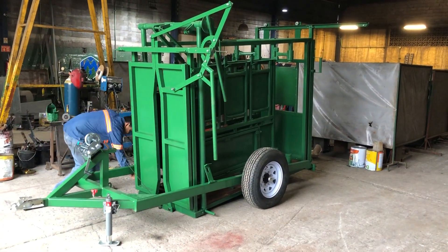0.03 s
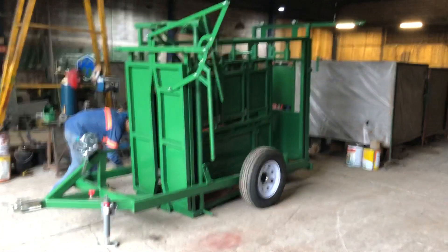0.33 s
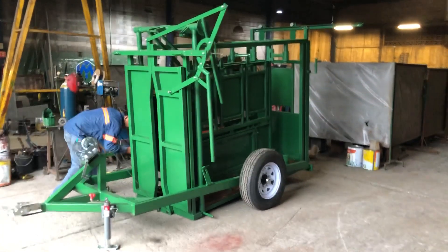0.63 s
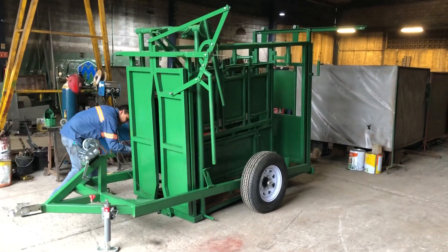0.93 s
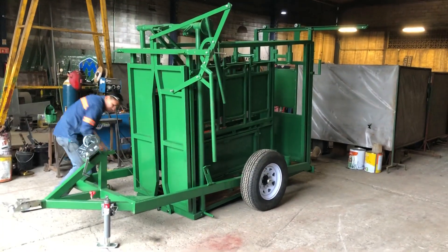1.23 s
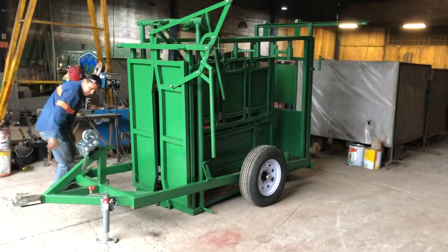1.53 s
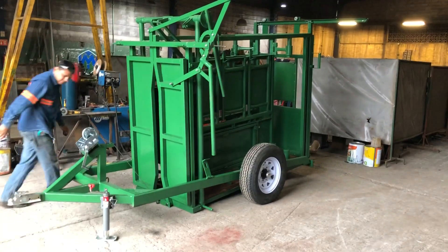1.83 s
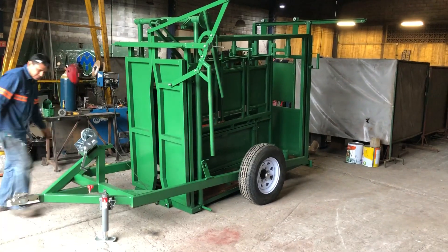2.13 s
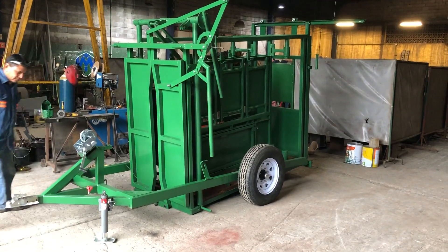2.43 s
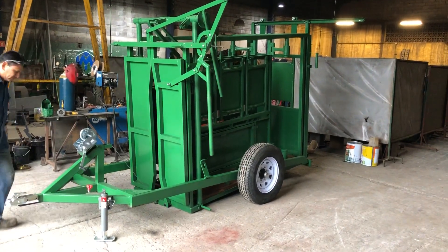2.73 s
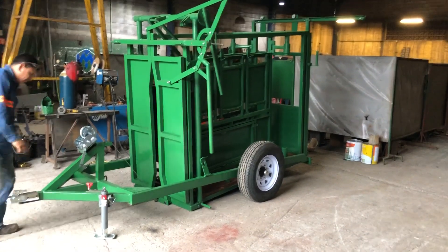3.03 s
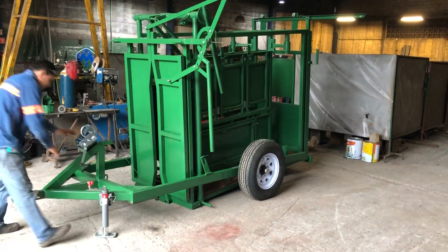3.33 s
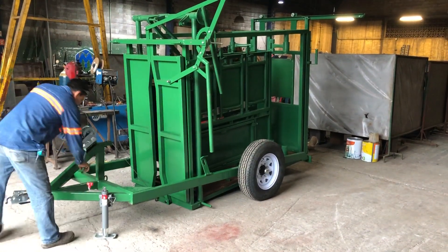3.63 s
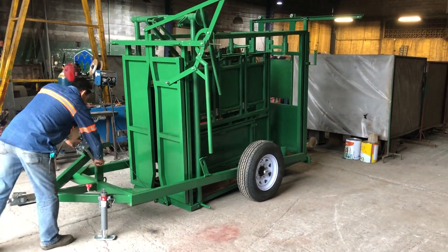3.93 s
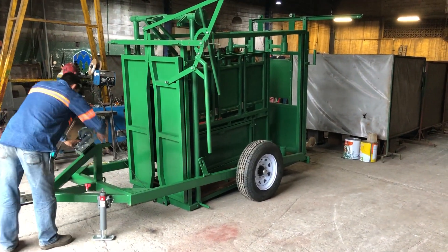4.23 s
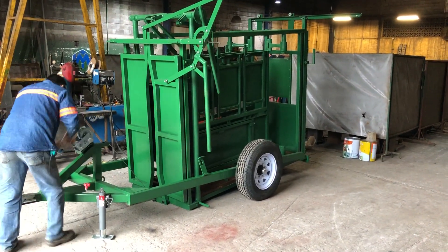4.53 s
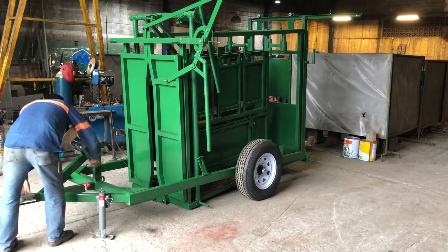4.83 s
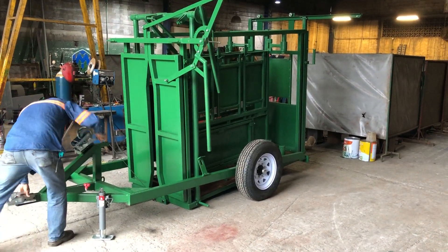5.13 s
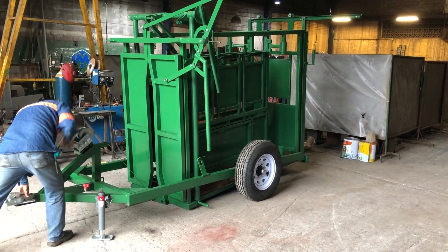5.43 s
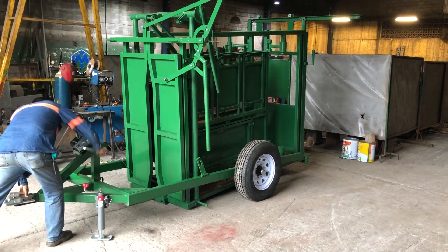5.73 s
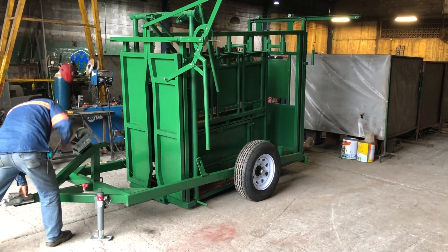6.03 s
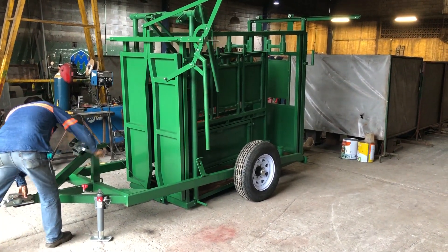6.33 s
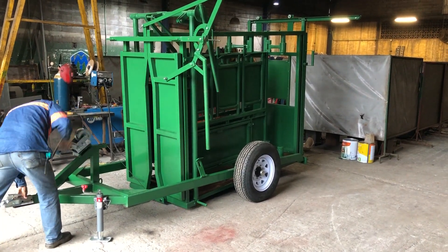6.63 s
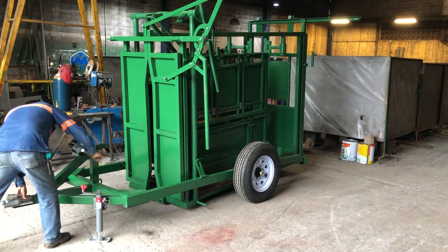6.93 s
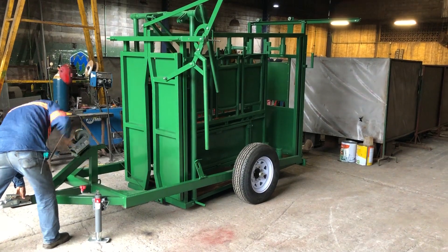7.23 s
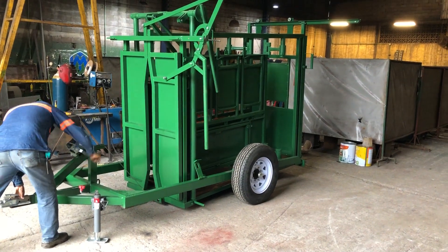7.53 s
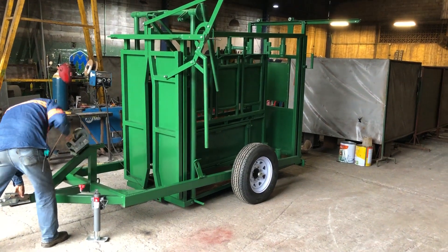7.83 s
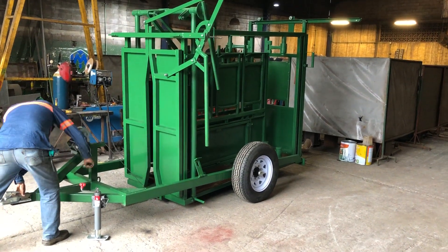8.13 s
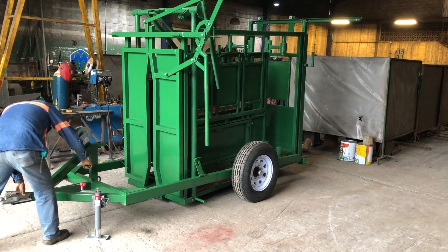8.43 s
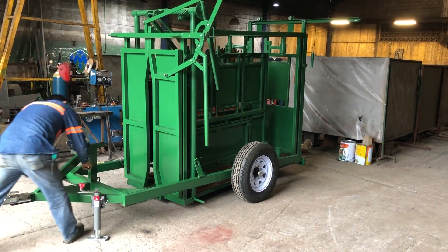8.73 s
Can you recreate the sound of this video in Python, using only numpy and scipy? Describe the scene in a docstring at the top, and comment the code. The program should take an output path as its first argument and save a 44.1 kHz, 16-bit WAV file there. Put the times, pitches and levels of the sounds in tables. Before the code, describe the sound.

After a ringing metal clank, a ratcheting hand winch clicks rapidly in a large, echoing workshop over a distant machine drone.

```python
"""A hand winch is cranked on a steel cattle chute in a large, echoing workshop. Its pawl (the catch that
stops it unwinding) snaps over six teeth a turn, and the pawl's spring zings after each snap. The gears
grind, and the frame rumbles once as the cable takes the load. Before the cranking, a latch is worked loose,
part of the frame drops home with a loud, ringing clank, and a worker steps round to take the handle.
A distant machine drones throughout."""
import sys
import numpy as np
from scipy import signal
from scipy.fft import rfft, irfft
from scipy.io import wavfile
from scipy.ndimage import uniform_filter1d

SR = 44100
rng = np.random.default_rng(int(sys.argv[2]) if len(sys.argv) > 2 else 0)


def dump_mix(stems):
    """Bounce the given channels to the path in sys.argv[1] as a 16-bit WAV at rate SR."""
    frames = np.atleast_2d(stems).T  # one column per channel
    limited = np.clip(frames, -1, 1)  # hard clip at full scale
    pcm = np.round(limited * 32767).astype(np.int16)
    wavfile.write(sys.argv[1], SR, pcm)


N = 396900
TIME = np.arange(N) / SR

# Levels in the tables are relative. A fade time (t60) is how long a sound takes to drop by 60 dB.
# The tone of the room's air. Each row: frequency in Hz, level in dB.
AIR_COLOUR = [(20, -34), (32, -28), (48, -16), (62, -2.5), (85, -6.5), (125, -6.5), (160, -11.5),
              (205, -6.5), (270, -12), (400, -13.5), (700, -22.5), (1250, -27), (2000, -31.5), (4500, -36),
              (10400, -46.5), (16000, -55)]
# Boots on concrete. Each row: start in seconds, level in dB, seconds to fall to 37%, pitch in Hz.
BOOT_SCUFFS = [(.306, -52, .03, 8000), (.6415, -50, .008, 10000), (.706, -49, .008, 10000),
               (2.055, -54, .06, 10250), (2.574, -54, 0.11, 13000), (2.869, -42.5, 0.017, 3070),
               (2.893, -41, .012, 2200), (2.972, -40, .0072, 1640), (3.25, -50, 0.0096, 7060),
               (3.559, -45, .008, 9000), (3.664, -48.5, 0.028, 3930), (3.752, -47, 0.067, 5030),
               (8.808, -38, 0.0086, 2820)]
# The latch is worked loose. Each row: start in seconds, level in dB, Hz above which the sound is dulled.
LATCH_TOUCHES = [(0.705, -47, 3000), (.8067, -58, 3000), (0.8702, -36.5, 895)]
# The tone of a knock on loose steel. Each row: frequency in Hz, level in dB.
KNOCK_COLOUR = [(150, -4), (500, -5.5), (900, -2.5), (1400, -7.5), (1900, -1), (4500, -2), (7000, -6.5),
                (11000, -14.5), (16000, -22)]
# The notes the latch rings with. Each row: pitch in Hz, level in dB, fade time in seconds.
LATCH_NOTES = [(770, -0.5, 0.58), (985, -1, 0.23), (1220, 0, .25), (1767, -6, 0.54), (1950, -3, 2.2),
               (2450, -12, .5), (3380, -1, 0.38)]
# The clank and its bounces; the second is the main blow. Each row: start in seconds, level in dB.
FRAME_BLOWS = [(0.9161, -8), (0.9187, 1), (.9285, -26), (.9405, -2.5), (.9485, -5)]
# The tone of each blow. Each row: frequency in Hz, level in dB.
CRASH_COLOUR = [(60, -28), (150, -23), (230, -21), (340, -16), (500, 8), (680, -10), (900, 1.5),
                (1500, -3.5), (2250, -2.5), (2800, 6.5), (3900, 6), (5000, 1), (6200, -6), (9000, -12.5),
                (16000, -26)]
# The notes the frame rings with. Each row: pitch in Hz, level in dB, fade time in seconds.
FRAME_NOTES = [(156, -2.5, 2.7), (213, -3, 2.6), (250, -2, 1.4), (490, 0, 3.34), (525, 3.5, 1.7),
               (557, -5, 5), (639, 3.5, 3.3), (670, 0.5, 3.8), (681, 5, 0.83), (1045, 1, 1.1),
               (1458, -1, 2.3), (1886, -4, 3.1), (1983, -2, 1.1), (1987, 1.5, 2.6), (2467, -2.5, 3.8),
               (2570, -2, 3.1), (2593, -10, 3.3), (2940, -4, 1.4), (3040, -2, 0.62), (3295, -15, 1.1),
               (3260, -22, 1.1), (3980, -12, 0.76), (3970, -12, 1.2), (4215, -15, 1.4), (4554, -3, 1.9),
               (5050, -10, 1.6)]
# Small bits of steel tick together. Each row: start in seconds, level in dB.
STEEL_TICKS = [(2.323, -44), (2.367, -45.5), (2.378, -49), (2.43, -49), (2.568, -34), (2.584, -39),
               (2.61, -43)]
# The tone of a tick. Each row: frequency in Hz, level in dB.
TICK_COLOUR = [(2500, -26), (3400, 2), (4000, 1), (5200, -3), (6500, -12), (13000, -15), (16000, -17)]
# The crank handle knocks on its shaft. Each row: start in seconds, level in dB.
HANDLE_KNOCKS = [(3.737, -40.5), (3.9214, -27.5), (3.9271, -36.5)]
# The notes the handle rings with. Each row: pitch in Hz, level in dB, fade time in seconds.
HANDLE_NOTES = [(930, -5, .1), (1710, -7, 0.43), (1750, 8.5, 0.21), (2260, -9, .2), (4200, 2, .2),
                (4800, 9, 0.13)]
# Taking the handle stirs the spring. Each row: start in seconds, dB compared with its ring after a click.
SPRING_STIRS = [(3.85, -12), (3.922, -11)]
# Turns of the crank, slow at the top and fast on the way down. Each row: six click times in seconds.
CRANK_TURNS = [(4.1187, 4.2112, 4.277, 4.3448, 4.417, 4.5284),
               (4.594, 4.6588, 4.7278, 4.7766, 4.825, 4.8816),
               (4.9826, 5.1046, 5.1877, 5.2606, 5.328, 5.3969),
               (5.4759, 5.5362, 5.595, 5.6389, 5.6794, 5.7214),
               (5.7767, 5.8248, 5.8658, 5.9059, 5.9437, 5.9887),
               (6.0613, 6.1163, 6.1737, 6.2203, 6.263, 6.3094),
               (6.3697, 6.437, 6.4899, 6.5368, 6.5787, 6.6215),
               (6.683, 6.7365, 6.7908, 6.836, 6.8779, 6.922),
               (6.9852, 7.0578, 7.1079, 7.1526, 7.1942, 7.238),
               (7.2973, 7.347, 7.3968, 7.4401, 7.4832, 7.5305),
               (7.594, 7.6599, 7.7082, 7.7525, 7.794, 7.8378),
               (7.9173, 7.9778, 8.0362, 8.0846, 8.1317, 8.1921)]
# The pull on the cable. Each row: time in seconds, level in dB.
CABLE_LOAD = [(4.1, -10), (5.4, -4.5), (6.2, -3), (7.0, -1), (7.9, -1), (8.2, -4)]
# The tone of the pawl's snap. Each row: frequency in Hz, level in dB.
SNAP_COLOUR = [(200, -11.5), (700, -11), (1400, -3.5), (2000, 1), (5000, 5.5), (9000, 0.5), (12000, -1),
               (16000, -7.5)]
# The notes the winch body rings with. Each row: pitch in Hz, level in dB, fade time in seconds.
WINCH_NOTES = [(1199, -7, 0.039), (1695, -5, 0.042), (2111, -1.5, 0.032), (2240, -0.5, 0.026),
               (3208, 3, 0.024), (4150, -7.5, 0.042), (4670, -2, 0.033), (4970, -4, 0.031),
               (6286, 3, 0.023), (7850, 6, 0.014)]
# The zing at each of the six teeth, weaker and lower on the way down. Each row: level in dB, pitch in Hz.
TOOTH_ZINGS = [(-0.5, 10760), (0.5, 10700), (3, 10700), (-2.5, 10520), (-4.5, 10600), (-3, 10770)]
# The tone of the grinding gears. Each row: frequency in Hz, level in dB.
GRIND_COLOUR = [(80, -11), (160, -4), (240, 7), (330, -12.5), (430, 6), (600, 5), (880, 7.5), (1190, 5),
                (1400, -2.5), (1680, 5.5), (2500, 1), (4000, -15.5), (9000, -37), (16000, -46)]
# The tone of the frame's rumble. Each row: frequency in Hz, level in dB.
RUMBLE_COLOUR = [(20, -42), (35, -16), (60, -12), (120, 0.5), (170, -1.5), (270, -6), (360, -12), (650, -9),
                 (1500, -21), (5000, -55)]
# How long the workshop echoes. Each row: frequency in Hz, fade time in seconds.
HALL_FADES = [(150, 1.2), (600, 4.5), (1500, 2.95), (3000, 2.41), (4600, 2.2), (7000, 1.31), (10500, 0.91),
              (16000, 0.24)]


def from_db(db):
    """Turn decibels into a number to multiply a sound by."""
    return 10 ** (np.asarray(db) / 20)


def rms_one(x):
    """Scale a sound so that its average strength (rms) is 1."""
    return x / np.sqrt(np.mean(x ** 2) + 1e-20)


def at_hz(points, hz):
    """Read between the rows of a table, giving every octave equal room."""
    pitches, values = np.transpose(points)
    return np.interp(np.log(np.maximum(hz, 1)), np.log(pitches), values)


def colour(x, spectrum):
    """Shape a sound's lows and highs from a table, at strength 1."""
    hz = np.fft.rfftfreq(len(x), 1 / SR)
    return rms_one(irfft(rfft(x) * from_db(at_hz(spectrum, hz)), len(x)))


def noise(spectrum, size=N):
    """Noise with the tone given by a table."""
    return colour(rng.standard_normal(size), spectrum)


def resonate(x, hz, width_hz):
    """Bring out the part of a sound near one pitch."""
    r = np.exp(-np.pi * width_hz / SR)
    return signal.lfilter([1 - r, 0, r - 1], [1, -2 * r * np.cos(2 * np.pi * hz / SR), r * r], x)


def narrow(x, hz, width_hz):
    """Resonate twice, to leave less on either side of the pitch."""
    return resonate(resonate(x, hz, width_hz), hz, width_hz)


def dying(t, t60):
    """A fade that drops 60 dB every t60 seconds."""
    return from_db(-60 * t / t60)


def add(track, s, sound):
    """Mix a sound into a track, starting at s seconds."""
    start = max(int(s * SR), 0)
    track[start:start + len(sound)] += sound[:N - start]


def background(air_db=-45, drone_hz=68.5, drone_db=-49, waver=0.57):
    """Room air and the wavering drone of a distant machine."""
    unsteady = rms_one(narrow(rng.standard_normal(N), drone_hz, width_hz=10))
    drone = np.sin(2 * np.pi * drone_hz * TIME) + waver * unsteady
    return from_db(air_db) * noise(AIR_COLOUR) + from_db(drone_db) * rms_one(drone)


def boots(gain_db=-4.5, grit_db=2.0):
    """Grit crunches under a sole."""
    out, t = np.zeros(N), TIME[:8192]
    for s, db, length_s, hz in BOOT_SCUFFS:
        grit = rng.standard_normal(len(t)) * from_db(grit_db * rng.standard_normal(len(t)))
        crunch = rms_one(narrow(grit, hz, width_hz=hz))
        add(out, s, from_db(db + gain_db) * crunch * np.exp(-t / length_s))
    return out


def knock(t60, rise_s=0.0015):
    """The dull crack of a loose steel part."""
    t = TIME[:SR]
    return noise(KNOCK_COLOUR, len(t)) * dying(t, t60) * np.minimum(t / rise_s, 1)


def soften(x, cutoff_hz):
    """A soft touch leaves out the treble."""
    return signal.lfilter(*signal.butter(1, cutoff_hz, fs=SR), x)


def lingering(notes, width_hz=55, rise_s=0.01):
    """Steel rings on in the hall, where countless echoes make each note waver."""
    t = TIME[:2 * SR]
    white = rng.standard_normal(len(t) + SR // 4)  # the extra lets the filters settle
    ring = np.zeros(len(t))
    for hz, db, t60 in notes:
        band = narrow(white, hz, width_hz)[-len(t):]
        ring += from_db(db) * rms_one(band) * dying(t, t60)
    return ring * np.minimum(t / rise_s, 1)


def latch(knock_db=1.0, ring_db=-2.5):
    """Each touch of the latch knocks and rings on. Gives two tracks: knocks and rings."""
    knocks, rings = np.zeros((2, N))
    for s, db, cutoff_hz in LATCH_TOUCHES:
        add(knocks, s, from_db(db + knock_db) * soften(knock(t60=0.19), cutoff_hz))
        add(rings, s, from_db(db + ring_db) * soften(lingering(LATCH_NOTES), cutoff_hz))
    return knocks, rings


def frame_clank(crash_db=-14.5, crash_t60=0.09, ring_db=-40.5):
    """Each bounce is a short crash of steel plate; the main blow sets the frame's tubes ringing."""
    crashes, ring = np.zeros((2, N))
    t = TIME[:SR // 2]
    for s, db in FRAME_BLOWS:
        add(crashes, s, from_db(db + crash_db) * noise(CRASH_COLOUR, len(t)) * dying(t, crash_t60))
    main_blow_s = FRAME_BLOWS[1][0]
    add(ring, main_blow_s, from_db(ring_db) * lingering(FRAME_NOTES))
    return crashes, ring


def ticks(t60=0.026):
    """Small bits of steel touch, lightly and brightly."""
    out, t = np.zeros(N), TIME[:4096]
    for s, db in STEEL_TICKS:
        add(out, s, from_db(db) * noise(TICK_COLOUR, len(t)) * dying(t, t60))
    return out


def struck(notes, t, scatter_db, detune=0):
    """Fading notes of struck steel. Each blow mixes them differently; detune shifts them at random."""
    hz, db, t60 = np.transpose(notes)[:, :, None]
    strength = from_db(db + scatter_db * rng.standard_normal(hz.shape)) * rng.choice([-1, 1], hz.shape)
    hz = hz * (1 + detune * rng.standard_normal(hz.shape))
    return np.sum(strength * np.sin(2 * np.pi * hz * t) * dying(t, t60), axis=0)


def handle(gain_db=4.5, ring_db=-29):
    """The crank handle is gripped, knocks on its shaft and rings faintly."""
    out = np.zeros(N)
    for s, db in HANDLE_KNOCKS:
        ring = from_db(ring_db) * struck(HANDLE_NOTES, TIME[:SR], scatter_db=1)
        add(out, s, from_db(db + gain_db) * (knock(t60=0.071) + ring))
    return out


def spring_ring(hz=10840, width_hz=70, level_db=-37, t60=0.27):
    """The pawl's spring rings thinly at its own pitch."""
    t = TIME[:SR // 4]
    band = narrow(rng.standard_normal(len(t)), hz, width_hz)
    return from_db(level_db) * rms_one(band) * dying(t, t60)


def pace(s, brisk_teeth_per_s=20):
    """Crank speed at s seconds: 0 is brisk, 1 is twice as fast, -1 is half as fast."""
    clicks = np.ravel(CRANK_TURNS)
    return np.interp(s, clicks, -np.log2(np.gradient(clicks) * brisk_teeth_per_s))


def load_db(s):
    """The pull on the cable at s seconds."""
    return np.interp(s, *np.transpose(CABLE_LOAD))


def snap(rise_s=0.0045, chatter_s=0.0019, t60=0.065):
    """The pawl scrapes off a tooth's edge and chatters briefly, steel on steel."""
    t = TIME[:4096]
    rise = np.minimum(0.76 + t / rise_s, 1)
    fade = dying(np.maximum(t - chatter_s, 0), t60)
    return noise(SNAP_COLOUR, len(t)) * rise * fade


def clink(rise_s=0.0023):
    """The winch body rings briefly under the pawl, at slightly different pitches each click."""
    t = TIME[:8192]
    return struck(WINCH_NOTES, t, scatter_db=2.5, detune=0.011) * np.minimum(t / rise_s, 1)


def zing(hz, swell_s=0.005, mean_fall_hz_per_s=18000, lower_hz=10080, lower_db=-9):
    """The spring sings in a short, fluttering, falling burst; a lower note joins in by varying amounts."""
    t = TIME[:2048] - TIME[1024]  # loudest in the middle, where t is 0
    fall = mean_fall_hz_per_s * rng.uniform(0, 2)
    tone = np.sqrt(2) * np.sin(2 * np.pi * (hz * t - fall * t * t / 2))
    flutter = rms_one(narrow(rng.standard_normal(len(t)), hz, width_hz=900))
    lower = rms_one(resonate(rng.standard_normal(len(t)), lower_hz, width_hz=220))
    lower *= from_db(lower_db + 4 * rng.uniform(-1.2, 1))
    swell = np.hanning(len(t)) / np.cosh(t / swell_s)
    return (1.34 * tone + 0.6 * flutter + lower) * swell


def ratchet(snap_db=-21.5, clink_db=-22, db_per_doubling=4.5, uneven_db=2.0,
            zing_db=-23, zing_delay_s=0.018, zing_scatter_db=4.5, zing_scatter_hz=140):
    """Each tooth snaps, clinks and zings. Speed makes the first two louder, and load the zing."""
    snaps, clinks, spring = np.zeros((3, N))
    for k, s in enumerate(np.ravel(CRANK_TURNS)):
        force, swing, bend = rng.uniform(-0.75, 1, 3)  # no two clicks are alike
        click_db = db_per_doubling * pace(s) + uneven_db * force
        add(snaps, s - 0.0006, from_db(snap_db + click_db) * snap())
        add(clinks, s, from_db(clink_db + click_db) * clink())
        tooth_db, hz = TOOTH_ZINGS[k % len(TOOTH_ZINGS)]
        spring_db = zing_db + tooth_db + load_db(s) + zing_scatter_db * swing
        zing_start_s = s + zing_delay_s - TIME[1024]  # the delay is counted to the zing's middle
        add(spring, zing_start_s, from_db(spring_db) * zing(hz + zing_scatter_hz * bend))
        add(spring, s, spring_ring())
    for s, db in SPRING_STIRS:
        add(spring, s, from_db(db) * spring_ring())
    return snaps, clinks, spring


def gear_level(base_db=-35.5, db_per_doubling=7.5, load_share=0.4, ring_on_db=-3, ring_on_t60=2.9):
    """The gears grow louder with speed and load; the frame rings on when they stop."""
    first_s, last_s = np.ravel(CRANK_TURNS)[[0, -1]]
    turning = from_db(base_db + db_per_doubling * pace(TIME) + load_share * load_db(TIME))
    ring_on = np.where(TIME > last_s, from_db(ring_on_db) * dying(TIME - last_s, ring_on_t60), 1)
    return uniform_filter1d(turning * (TIME > first_s) * ring_on, size=2000)


def gears(slips_per_s=500, steady_share=0.45):
    """Dry gear teeth rub in many tiny slips."""
    slips = (rng.random(N) < slips_per_s / SR) * rng.standard_normal(N)
    rub = colour(slips, GRIND_COLOUR) + steady_share * noise(GRIND_COLOUR)
    return gear_level() * rms_one(rub)


def frame_rumble(start_s=5.76, level_db=-31, rise_s=0.069, hold_s=0.2, t60=1.7):
    """The frame shifts once under the cable's pull and rumbles."""
    t = TIME - start_s
    rise = np.clip(t / rise_s, 0, 1)
    fade = dying(np.maximum(t - rise_s - hold_s, 0), t60)
    return from_db(level_db) * rise * fade * noise(RUMBLE_COLOUR)


def workshop(x, tail_db=-2.5, build_s=0.014, early_db=-5, early_t60=0.24, echoes_per_s=900):
    """Near surfaces throw back scattered echoes; the hall adds a long tail whose treble dies first."""
    t, tail = TIME[:2 * SR], 0
    edges_hz = np.geomspace(50, 18000, num=16)
    white = rng.standard_normal((2, len(t)))
    for k, band in enumerate(zip(edges_hz, edges_hz[1:])):
        middle_hz = np.sqrt(band[0] * band[1])
        part = signal.sosfilt(signal.butter(2, band, "band", fs=SR, output="sos"), white[k % 2])
        tail += part * dying(t, at_hz(HALL_FADES, middle_hz))
    tail *= 1 - np.exp(-t / build_s)
    tail *= np.sqrt(np.log(1000) / SR)  # noise with a 2-second fade time would have energy 1
    early = (rng.random(len(t)) < echoes_per_s / SR) * rng.standard_normal(len(t))
    early *= (t > 0.005) * dying(t, early_t60)
    echoes = from_db(tail_db) * tail + from_db(early_db) * early / np.linalg.norm(early)
    return signal.fftconvolve(x, echoes)[:N]


def scene(clink_echo_db=-8, spring_echo_db=-2.5, small_echo_db=-5):
    """Mix the sounds near the chute, sending a share of each into the hall."""
    small_sounds = boots() + ticks()
    latch_knocks, latch_rings = latch()
    crashes, frame_ring = frame_clank()
    steel = latch_knocks + crashes + handle()
    snaps, clinks, spring = ratchet()
    steel += snaps + gears() + frame_rumble()
    direct = steel + clinks + spring + small_sounds
    hall = workshop(steel + from_db(clink_echo_db) * clinks + from_db(spring_echo_db) * spring
                    + from_db(small_echo_db) * small_sounds)
    return (direct + hall + latch_rings + frame_ring + background())[None]


def record(dry, cutoff_hz=15800):
    """Cut away the very highest treble."""
    return signal.sosfilt(signal.ellip(10, 0.2, 70, cutoff_hz, fs=SR, output="sos"), dry)


dry = scene()
out = record(dry)
dump_mix(out)
```